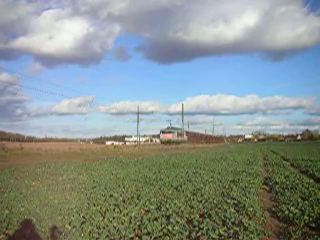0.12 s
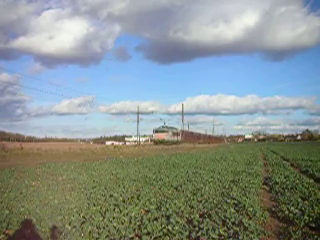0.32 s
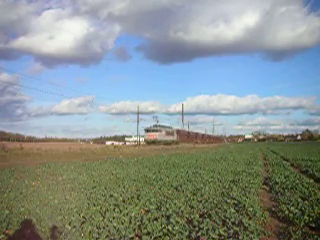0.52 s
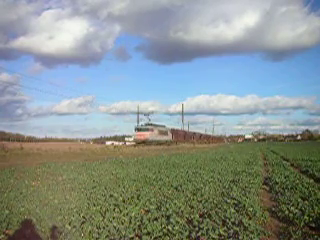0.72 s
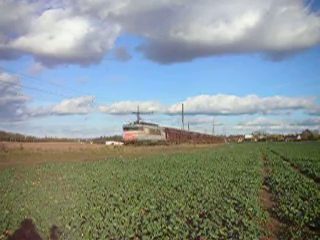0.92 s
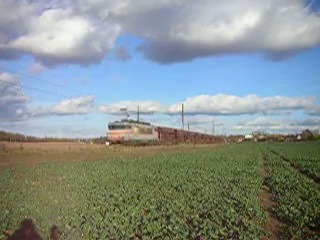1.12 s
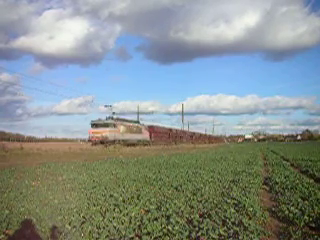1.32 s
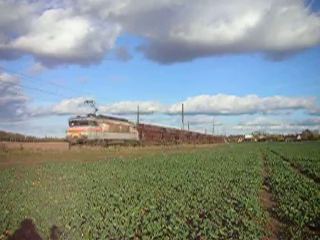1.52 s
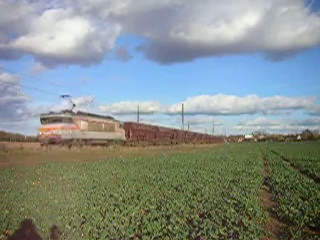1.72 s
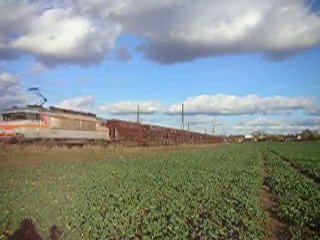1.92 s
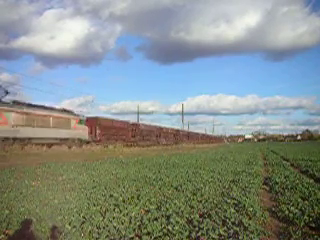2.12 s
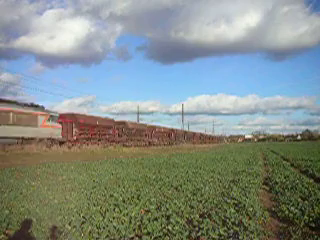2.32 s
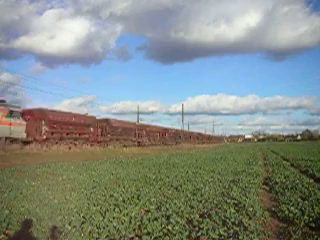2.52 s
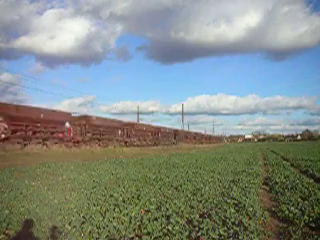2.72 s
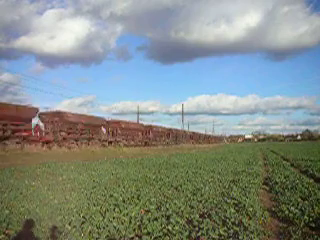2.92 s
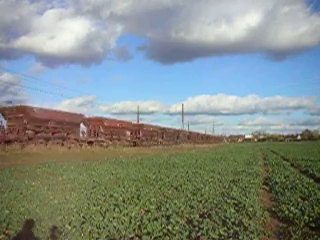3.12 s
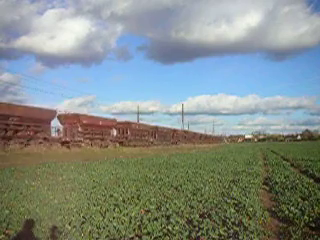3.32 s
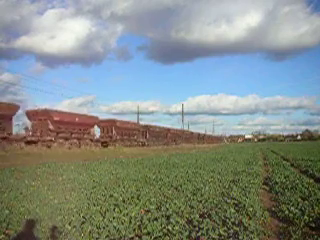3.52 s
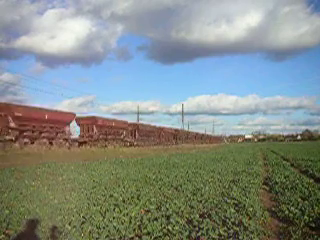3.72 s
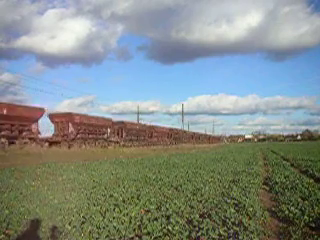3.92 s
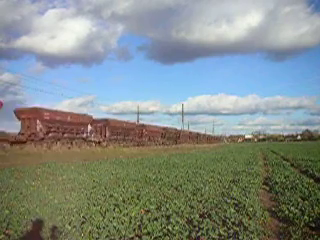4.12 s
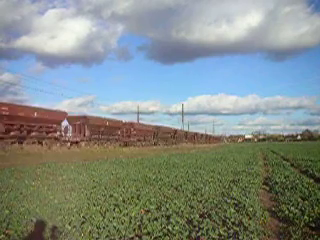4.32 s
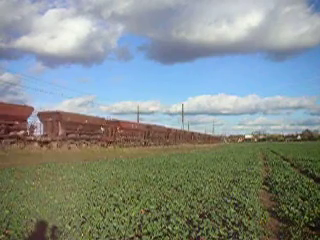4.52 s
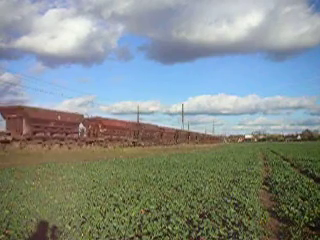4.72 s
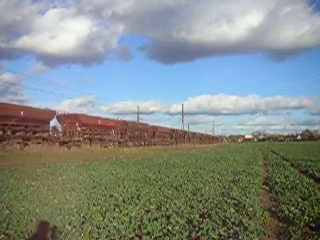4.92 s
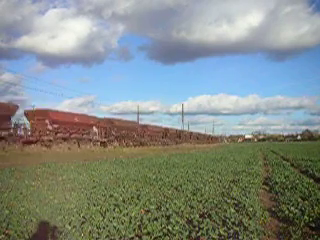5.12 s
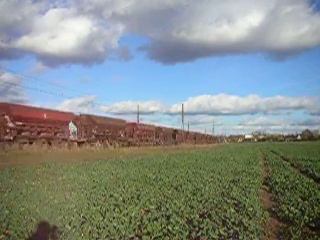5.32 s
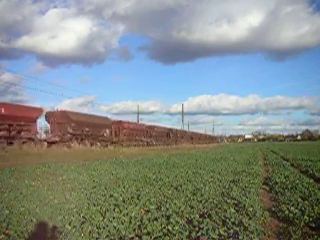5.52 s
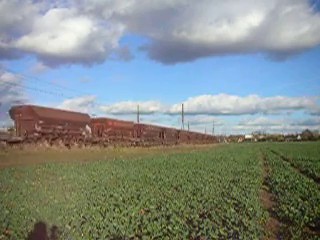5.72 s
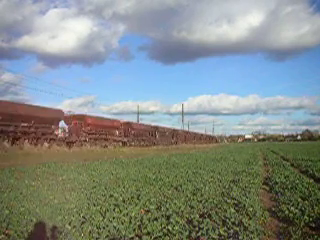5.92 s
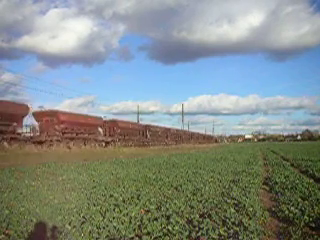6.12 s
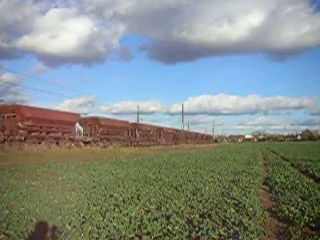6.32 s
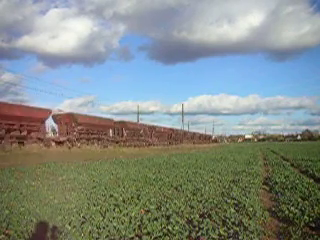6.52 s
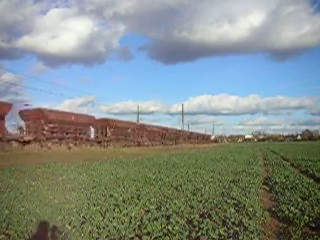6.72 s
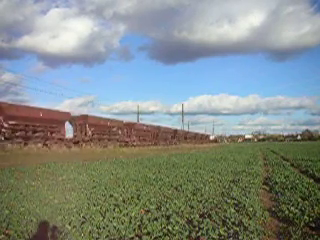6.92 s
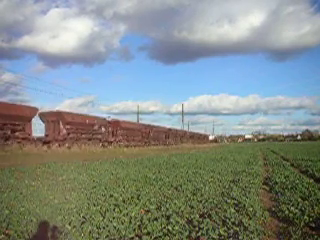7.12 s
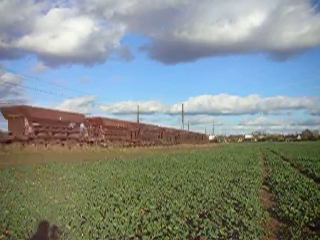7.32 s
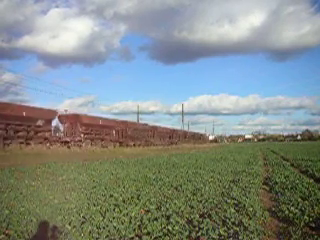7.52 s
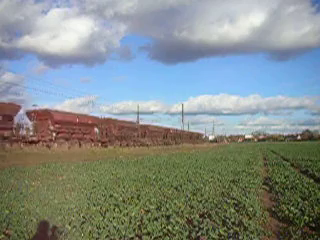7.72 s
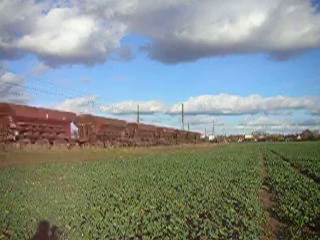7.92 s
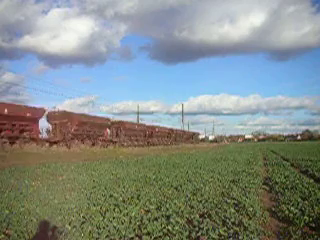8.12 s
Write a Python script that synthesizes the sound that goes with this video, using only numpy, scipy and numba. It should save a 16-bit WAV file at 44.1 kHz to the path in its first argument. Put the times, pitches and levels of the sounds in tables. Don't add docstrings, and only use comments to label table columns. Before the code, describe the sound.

A distant electric train approaches across a field, its rush nearly masked by fluttering low wind buffets. The blower whine swells first, then a stronger gear whine throbs and falls away. A dense, rough wheel-on-rail roar of wagons takes over and holds, with hiss and faint metallic ringing, on a muffled, gain-pumping mono microphone with scattered clicks.

```python
import sys
import numpy as np
from scipy import signal
from scipy.fft import rfft, irfft, next_fast_len
from scipy.io import wavfile
from scipy.ndimage import uniform_filter1d
from numba import njit

SR = 44100
rng = np.random.default_rng(int(sys.argv[2]) if len(sys.argv) > 2 else 0)


def store_pcm(level_fs):
    pcm = np.round(np.clip(level_fs, -1, 1) * 32767).astype(np.int16)
    wavfile.write(sys.argv[1], SR, np.atleast_2d(pcm).T)


def gain_from_db(level_db):
    decades = np.asarray(level_db, float) / 20
    return 10 ** decades


N = 365588
PAD = next_fast_len(N)


@njit
def svf(x, hz, width):
    y, band, low = np.empty(len(x)), 0., 0.
    for i in range(len(x)):
        g, k = np.tan(np.pi * hz[i] / SR), width / hz[i]
        v = (band + g * (x[i] - low)) / (1 + g * (g + k))
        band, low, y[i] = 2 * v - band, low + 2 * g * v, k * v
    return y


def resonate(x, hz, width_hz):
    return svf(svf(x, hz, width_hz), hz, width_hz)


def unit(x):
    return x / np.sqrt(np.mean(x ** 2))


def sine(hz):
    return np.sqrt(2) * np.sin(2 * np.pi * np.cumsum(hz) / SR)


def curves(table):
    s, *columns = np.transpose(table)
    return [np.interp(np.arange(N) / SR, s, column) for column in columns]


def walk(rate):
    hold = int(SR / rate)
    steps = np.repeat(rng.standard_normal(N // hold + 1), hold)
    return unit(uniform_filter1d(uniform_filter1d(steps, hold), hold)[:N])


def bump(start, length):
    i = np.arange(max(int(start * SR), 0), min(int((start + length) * SR), N))
    return i, np.sin(np.pi * (i / SR - start) / length)


# centre t/s, peak level/dB, pitch f/Hz, length t/s
GUSTS = [(0.616, -13, 345, 0.014), (0.641, -17, 287, .012), (0.709, -1.5, 332, 0.036),
         (0.806, -5.5, 328, 0.017), (0.891, -10, 307, 0.016), (1.012, -9, 399, 0.0099),
         (1.055, -8, 359, .045), (1.17, -7.5, 316, 0.013), (1.199, -9, 300, 0.022), (1.24, -18, 395, 0.01),
         (1.269, -15, 405, .014), (1.37, -16.5, 378, 0.01), (1.452, -6.5, 426, 0.018),
         (1.562, -9, 322, 0.036), (1.654, -9, 356, 0.014), (1.767, -6.5, 340, 0.035),
         (1.849, -10, 361, 0.049), (1.917, -13.5, 358, .031), (1.952, -10.4, 340, .014),
         (2.065, -10.5, 307, .022), (2.088, -12, 366, 0.019), (2.214, -10, 321.5, 0.073),
         (2.285, -9, 363, 0.016), (2.316, -9.5, 416, .012), (2.364, -12, 357, .034),
         (2.443, -15, 344, .062), (2.57, -12.5, 427, 0.025), (2.684, -12.5, 395, 0.017)]
# centre t/s, peak level/dB
SLAPS = [(.59, -17), (.681, -7), (0.699, -9.5), (.741, -5), (.778, -18), (.824, -5.5), (0.864, -6),
         (.923, -3.5), (.935, -10.5), (1.084, -15), (1.114, -3), (1.154, -7), (1.218, -7), (1.469, -7),
         (1.604, -13), (1.691, -12.5), (1.813, -7), (2.114, -7.5), (2.238, -7), (2.26, -11), (2.475, -15),
         (2.497, -12), (2.545, -5), (2.611, -8)]


def wind(rough=.8, spread=2.35, sag=.93, wander=.33, flutter_db=2.5, rise=.7):
    slap_hz, slap_s = 324, 0.0052
    port_hz, port_width_hz = 360, 605
    eddies = signal.sosfilt(signal.butter(4, 700, fs=SR, output="sos"), rng.standard_normal(N))
    drift, flutter = walk(350), gain_from_db(flutter_db * walk(200))
    peak_at = .5 ** (1 / rise)
    out = np.zeros(N)
    for s, db, hz, length in GUSTS + [(s, db, slap_hz, slap_s) for s, db in SLAPS]:
        i, _ = bump(s - peak_at * spread * length, spread * length)
        turns = np.cumsum(sag * hz * (1 + wander * drift[i])) / SR
        swing = np.cos(2 * np.pi * (turns - turns[int(len(i) * peak_at)]))
        swell = np.sin(np.pi * np.linspace(0, 1, len(i)) ** rise)
        out[i] += gain_from_db(db) * swell ** 2 * flutter[i] * (swing + rough * unit(eddies[i]))
    return gain_from_db(-3.0) * resonate(out, np.full(N, port_hz), port_width_hz)


# t/s, rail roar level/dB, wheel hiss level/dB re roar
ROLL = [(0, -31, -6.5), (.3, -30.5, -4.5), (.38, -29.5, -1), (.9, -27.5, -2), (1.2, -25, -3),
        (1.45, -23, -8.5), (1.9, -22, -7.5), (2.05, -17, -10.5), (2.3, -21, -3.5), (2.7, -20, -3),
        (3.3, -18, -3.5), (3.8, -17, -3.5), (4.5, -18, -3), (5.4, -18, -1.5), (6.5, -18, -1.5),
        (7.5, -18.5, -3.5), (8.05, -18.5, -3), (8.29, -23, -2.5)]
ROLL_HZ = [
    200,
    500,
    1200,
    2700,
]
# f/Hz, density level/dB per Hz
ROLL_COLOUR = [(28, -47), (46, -20.5), (59, -21.5), (102, -6.5), (242, -1), (485, -1), (680, -3),
               (913, -5.5), (1830, -6.5), (2190, -9), (2460, -6.5), (3100, -9), (3500, -12.5), (4700, -12)]


def rolling(shared_db=0.37, flicker_db=2.1, joints_db=1.03, group_db=0.02):
    roar, hiss = curves(ROLL)
    wagons = np.clip((np.arange(N) / SR - 1.9) / 0.88, 0, 1)
    body = -2.5 + 0.73 * group_db * walk(6.5)
    drone = -5.5 + 5 * wagons + 1.2 * group_db * walk(7)
    rail = .8 * group_db * walk(11)
    hiss = hiss + .6 * group_db * walk(11)
    hz = np.maximum(np.fft.rfftfreq(PAD, 1 / SR), 1)
    colour_hz, colour_db = np.transpose(ROLL_COLOUR)
    colour = gain_from_db(np.interp(np.log(hz), np.log(colour_hz), colour_db, right=-90))
    noise = rfft(rng.standard_normal(PAD)) * colour
    noise /= np.std(irfft(noise * (hz > 750) * (hz < 1900), PAD))
    throb = shared_db * walk(9) + joints_db * walk(70)
    out = 0
    for centre in 25 * 2 ** (np.arange(24) / 3):
        third_octave = np.clip(1 - np.abs(3 * np.log2(hz / centre)), 0, 1)
        share = [np.interp(np.log(centre), np.log(ROLL_HZ), row) for row in np.eye(4)]
        tilt_db = share[0] * body + share[1] * drone + share[2] * rail + share[3] * hiss
        out = out + irfft(noise * third_octave, PAD)[:N] * gain_from_db(tilt_db + 0.44 * flicker_db * walk(8))
    return out * gain_from_db(roar + throb)


# centre t/s, length t/s, f/Hz, width f/Hz,
# level/dB
SINGS = [(1.2, .35, 1115, 60, -30), (1.55, .25, 1140, 45, -30), (2.25, .7, 1157, 40, -27.5),
         (1.66, .14, 1432, 20, -29), (2.075, .06, 1432, 40, -22), (2.2, .65, 783, 20, -28),
         (2.1, .25, 700, 40, -30), (2.7, .75, 662, 14, -23), (2.72, .25, 765, 20, -29),
         (3.35, .45, 650, 25, -26), (6.1, 2.2, 1880, 170, -27), (4.8, 1.6, 3080, 200, -29),
         (5.2, 2.8, 2580, 160, -29), (7.3, 1.4, 3000, 250, -28), (.45, .3, 165, 60, -32),
         (.4, .4, 70, 50, -43), (2.47, .06, 285, 50, -17), (1.85, .15, 330, 200, -22)]


def wheels(sink=.02, clean=.45):
    out = np.zeros(N)
    for s, length, hz, width, db in SINGS:
        i, swell = bump(s - length, 2 * length)
        glide = hz * (1 - sink * (i / SR - s))
        ring = resonate(rng.standard_normal(len(i)), glide, 1.1 * width)
        tone = (width <= 30) * clean * sine(glide)
        out[i] += gain_from_db(db) * np.abs(swell) ** 1.5 * unit(tone + (1 - clean) * unit(ring))
    return out


def whine(hz, db, width_hz, clean):
    halo = unit(resonate(rng.standard_normal(N), hz, width_hz))
    return gain_from_db(db) * (clean * sine(hz) + (1 - clean) * halo)


# t/s, tooth rate f/Hz, level/dB
GEAR = [
    (0, 545, -36.5),
    (1.1, 543, -28),
    (2.35, 533, -29),
    (2.55, 529, -20.5),
    (3.16, 511, -16.5),
    (3.32, 492, -23),
    (3.65, 479, -19.5),
    (4.2, 466, -23),
    (4.55, 463, -37),
]
# t/s, blade rate f/Hz, level/dB
BLOWER = [
    (0, 1206, -37.5),
    (.8, 1197, -34),
    (1.1, 1185, -27),
    (1.6, 1174, -31.5),
    (1.9, 1173, -23),
    (2.2, 1157, -30),
    (2.7, 1154, -31.5),
    (3, 1118, -43),
]


def locomotive():
    t = np.arange(N) / SR
    hz, db = curves(GEAR)
    db = db + 5 * np.clip(t - 2, 0, 1) * np.cos(2 * np.pi * 5 * (t - 2.96))
    second_db = -34 + .65 * (db + 28.5) - 12 * np.clip(t - 3.8, 0, 1)
    fifth_db = -31.5 - 15.5 * (1 - np.exp(-((t - 2.6) / 1.5) ** 2))
    hz = hz * (1 + 0.0034 * walk(30))
    gear = whine(hz, db, width_hz=24., clean=.62)
    gear = gear + whine(2 * hz, second_db, width_hz=40., clean=.42)
    gear = gear + whine(5 * hz, fifth_db, width_hz=60., clean=.3)
    blower = whine(*curves(BLOWER), width_hz=45., clean=.5)
    return gear * (t < GEAR[-1][0]) + blower * (t < BLOWER[-1][0])


def scene():
    return (wind() + rolling() + wheels() + locomotive())[None]


# t/s, depth level/dB
DIPS = [(0.719, 8), (.82, 1.5), (1.08, 1), (1.7, 7), (2.13, 1.5), (2.56, 1.5), (2.79, 0.5), (2.99, 3.5),
        (4.17, 4.5), (5.06, 1.5), (5.3, 0.5), (6.08, 1), (6.35, 1), (6.8, 2), (7.07, 1), (7.68, 2.5)]


def gain_ride(fall_s=.01, recover_s=.081):
    db = np.zeros(N)
    for s, depth_db in DIPS:
        i, _ = bump(s, 3 * recover_s)
        after = np.maximum(i / SR - s, 0)
        db[i] -= depth_db * (1 - np.exp(-after / fall_s)) * np.exp(-(after / recover_s) ** 2)
    return gain_from_db(db)


# t/s, peak level/dB
TICKS = [(.697, -39.5), (0.7093, -42.5), (1.1743, -34), (2.1122, -34.5), (2.2385, -40.5), (2.899, -28.5),
         (2.9516, -30.5), (2.9529, -35.5), (3.1123, -35), (3.135, -40.5), (3.2767, -29.5), (3.8138, -31),
         (3.872, -27.5), (4.036, -33), (4.1029, -27.5), (4.1629, -40), (4.3679, -39), (4.4873, -42.5),
         (4.762, -30), (4.8296, -24), (4.9238, -29), (5.0199, -37.5), (5.3858, -34.6), (5.417, -24),
         (5.725, -33.5), (5.7844, -36), (6.2366, -41.5), (6.3672, -33), (6.5, -44), (7.6411, -28.5)]
# t/s, peak level/dB
GRAZES = [(.7056, -46), (.715, -46), (.8088, -55), (1.45, -51), (1.655, -56), (1.7629, -50), (2.062, -49),
          (2.097, -56), (2.31, -56), (2.378, -51), (2.9155, -52), (3.0941, -56), (3.1193, -49), (3.28, -51),
          (3.564, -48), (3.94, -56), (4.0265, -51), (4.0541, -46), (4.0747, -46.7), (4.3719, -51),
          (4.7668, -50), (4.8125, -50), (4.9312, -48.4), (5.4122, -50), (5.7079, -56), (6.5127, -52),
          (6.773, -45), (7.2024, -44.5), (7.313, -54), (7.6766, -53)]


def ticks():
    out, n = np.zeros(N), np.arange(-12, 13)
    for s, db in TICKS:
        half_width = 1.8 + 1.4 * rng.random()
        out[int(s * SR) + n] -= gain_from_db(db + 8) * np.clip(1 - (n / half_width) ** 2, 0, 1)
    for s, db in GRAZES:
        out[int(s * SR) + n] -= gain_from_db(db + 17.5) * np.exp(-(n / 3.3) ** 2)
    return out


def band_limit(x):
    return signal.sosfilt(signal.butter(12, 15850, fs=SR, output="sos"), x)


# f/Hz, level/dB
TOP = [
    (3000, 0.5),
    (3500, 0),
    (3900, -12.5),
    (4150, -20),
    (4400, -33.5),
    (4550, -44.5),
    (4700, -63.5),
    (4900, -82.5),
]


def record(dry):
    ceiling, knee = 0.91, .6
    x = signal.sosfilt(signal.butter(3, 45, "high", fs=SR, output="sos"), dry * gain_ride())
    x = np.clip(ceiling * np.tanh(x / ceiling), -.64, .68)
    grain = gain_from_db(-20.5) * uniform_filter1d(np.abs(x), size=90) + gain_from_db(-44)
    x = x + rng.standard_normal(N) * grain
    x = signal.sosfilt(signal.butter(2, 34, "high", fs=SR, output="sos"), x)
    edge_filter = signal.butter(6, 3700, "high", fs=SR, output="sos")
    edge = signal.sosfilt(edge_filter, x)
    edge = signal.sosfilt(edge_filter, edge[..., ::-1])[..., ::-1]
    x = x + (gain_from_db(2.2 * walk(260) - 0.9) - 1) * edge
    top = gain_from_db(np.interp(np.fft.rfftfreq(PAD, 1 / SR), *np.transpose(TOP)))
    x = irfft(rfft(x, PAD) * top, PAD)[..., :N]
    squeeze = np.sign(x) * np.maximum(np.abs(x) - knee, 0) ** 2
    x = x - 1.2 * signal.sosfiltfilt(signal.butter(10, 4600, fs=SR, output="sos"), squeeze)
    return band_limit(x + ticks() - .0099)


dry = scene()
out = record(dry)
store_pcm(out)
```